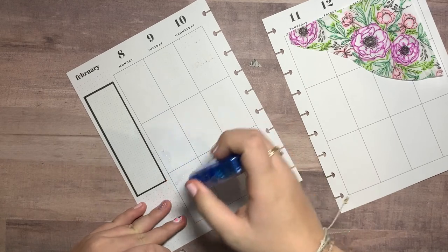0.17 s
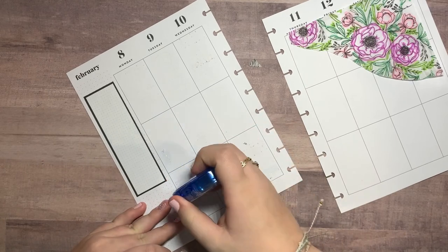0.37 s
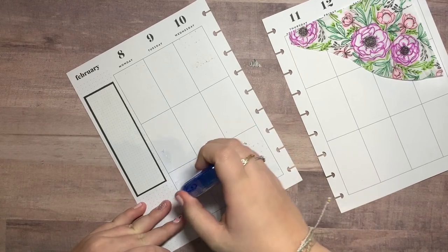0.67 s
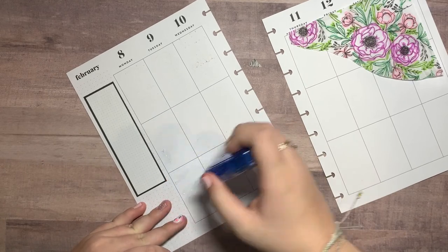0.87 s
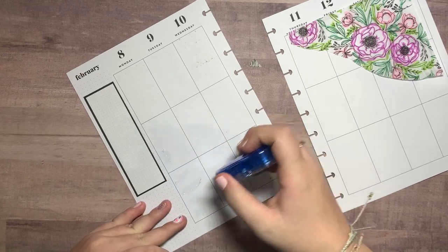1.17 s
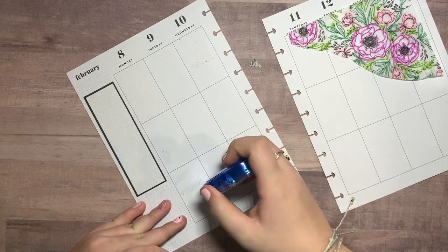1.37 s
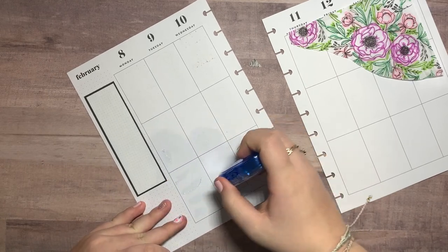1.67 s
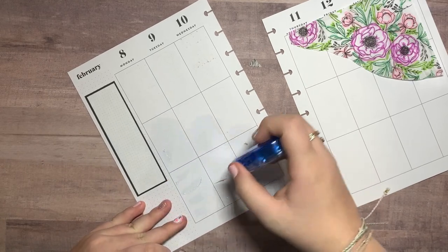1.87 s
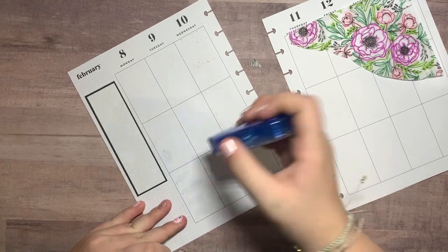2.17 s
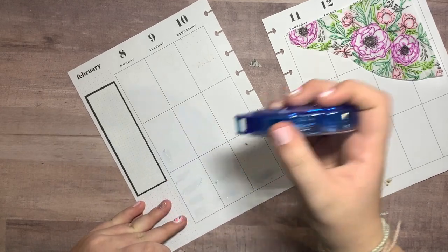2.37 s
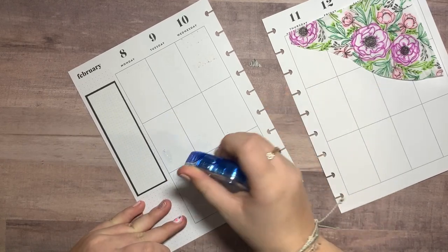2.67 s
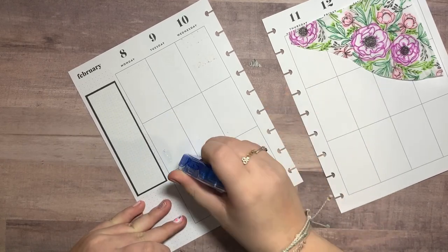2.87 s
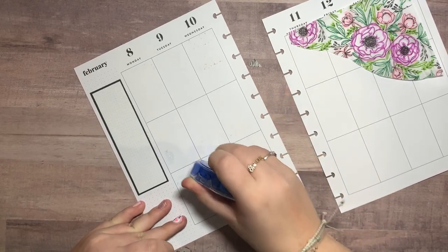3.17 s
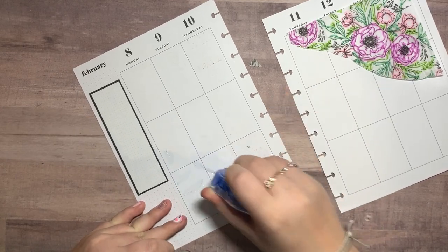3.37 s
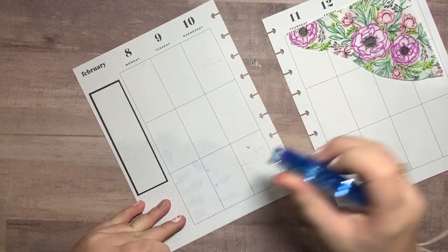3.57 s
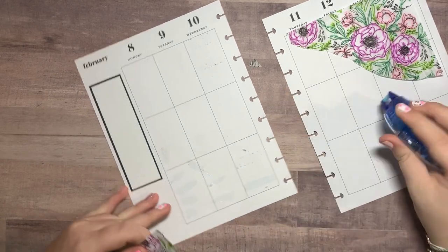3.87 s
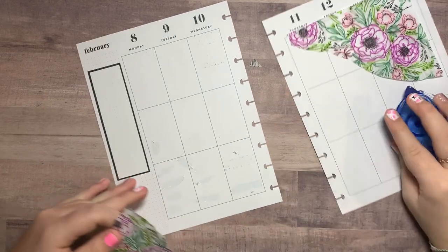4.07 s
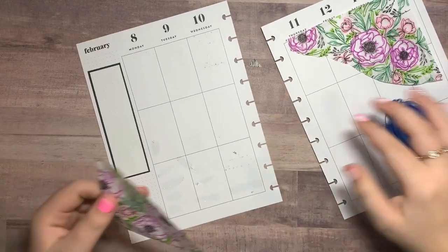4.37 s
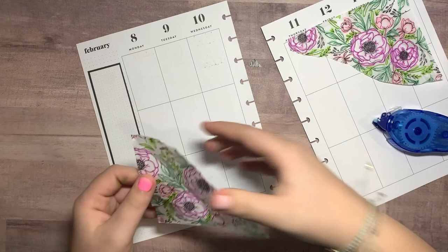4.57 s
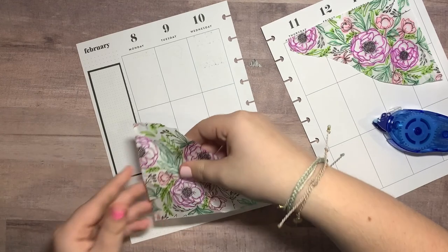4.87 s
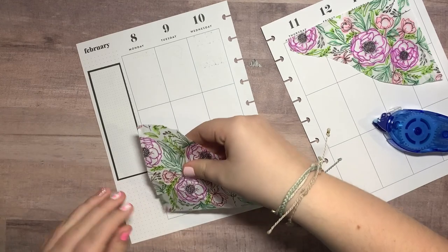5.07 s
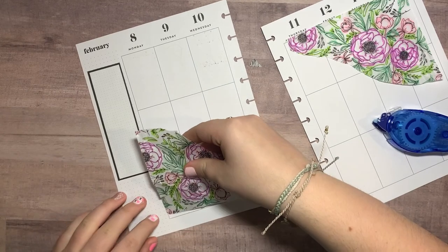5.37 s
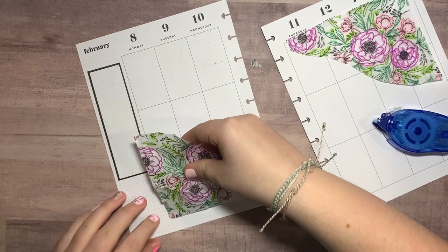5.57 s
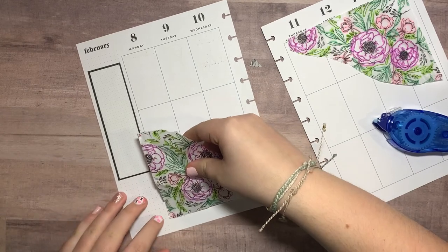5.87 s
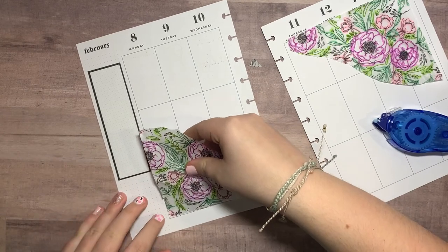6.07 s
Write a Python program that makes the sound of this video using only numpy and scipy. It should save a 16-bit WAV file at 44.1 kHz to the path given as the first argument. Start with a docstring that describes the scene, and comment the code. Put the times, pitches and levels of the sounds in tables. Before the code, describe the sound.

A quiet small room, heard close in stereo, with a soft low rumble and faint hiss throughout. At about 0.35 s a plastic tape roller touches paper on a wooden desk with a dull tap; a short brush leads into a fast ratcheting zip from 0.5 to 0.7 s, twelve crisp, bright clicks with a hollow plastic ring. Near-quiet follows, then a light thud at 1.3 s and a slightly slower zip from 1.4 to 1.67 s. Small plastic ticks gather from 2.45 to 2.97 s, with a soft thud at 2.84 s. The third and longest zip runs 2.98 to 3.26 s, speeding up. Faint paper slides follow, growing airy around 3.8 s. The tool is laid down with a firm clack and low thud at 4.2 s. Light paper and finger ticks follow, clearest at 4.69 s, fading after 5.3 s; a barely audible squeak comes near 5.7 s.

```python
"""In a quiet room with a low rumble, a faint whine and hiss, a plastic tape pen is set down on a wooden desk.
The desk thuds as noise-like touches ring the pen's parts; paper slides as grainy noise and the room echoes.
Three times the pen rolls over paper: each ratchet tooth snaps, rings the housing and jolts the desk.
Fingers tick in between; after the third roll the treble swells during sliding and the pen is laid aside.
Near the end comes a faint squeak made of narrow noise."""
import sys
import numpy as np
from scipy import signal
from scipy.fft import rfft, irfft
from scipy.io import wavfile
from scipy.ndimage import uniform_filter1d

SR = 44100
rng = np.random.default_rng(int(sys.argv[2]) if len(sys.argv) > 2 else 0)


def attenuation_scalar(level_db):
    """Turn a level in dB into a linear amplitude multiplier (20 dB per decade)."""
    decades = np.asarray(level_db, float) / 20
    return 10 ** decades


def wav_out(sig):
    """Save sig, one row per channel (or a flat mono array), as 16-bit PCM at SR to the path in sys.argv[1]."""
    wavfile.write(sys.argv[1], SR, np.round(np.clip(np.atleast_2d(sig).T, -1, 1) * 32767).astype(np.int16))


N = 274610  # samples in the whole scene
SIZE = 8192  # samples in one ringing sound
SILENT_DB = -200

# slow rise and fall of the building rumble: (t/s, level/dB)
RUMBLE_LEVEL = [(0.0, -65), (1.66, -63), (1.87, -66.5), (4.11, -58.5), (5.67, -64.5), (6.23, -63.5)]
# tone colour of the rumble: (f/Hz, level per Hz/dB)
RUMBLE_COLOUR = [(18, -42.5), (32, -7), (55, 3), (90, -5.5), (115, 0), (150, -13.5), (250, -19.5),
                 (330, -26), (550, -25.5), (800, -50.5)]
# tone colour of the microphone hiss: (f/Hz, level per Hz/dB)
HISS_COLOUR = [(250, -5), (550, -7.5), (1000, -8), (2200, -16.5), (6000, -19.5), (10500, -19), (13000, -19),
               (13800, -14), (14500, -19), (15200, -24)]
# blows into the desk top: (t/s, level/dB, push length/ms)
THUDS = [(.3435, -39.5, 2.73), (0.3578, -40, 4.4), (1.3298, -39.5, 3.6), (2.8388, -35, 3.4),
         (3.992, -48.5, 6.7), (4.1299, -39, 1.33), (4.1972, -28, 2.45), (4.682, -50.5, 0.27)]
# ways the desk top rings: (f/Hz, width before damping/Hz, relative level/dB)
DESK_MODES = [(54.5, 8.9, -7), (107.5, 12, 1), (150, 24, -5.5), (203, 75, -6), (259, 75, -6.5),
              (413, 80, -16.5), (617, 47, -11.5), (800, 110, -23)]
# small knocks of pen, nails and paper: (t/s, housing level/dB, snap level above housing/dB)
TICKS = [(0.3441, -54.5, -9), (0.3539, -51, -20), (0.3631, -47, -26.5), (0.4566, -58.5, 1.5),
         (0.4701, -57.5, -6), (0.4816, -72.5, 25.5), (.4977, -74.5, 16), (0.8402, -76, 3.5),
         (.99, -76.5, -14), (1.3271, -60.5, -22.5), (1.3829, -54.5, -32.5), (1.6937, -51, -16),
         (1.7792, -72, -3), (2.0651, -77, 13.5), (2.345, -79.5, -20), (2.404, -84, -24),
         (2.453, -58.5, -25.5), (2.4731, -53, -30), (2.5029, -65, -13), (2.519, -50, -25),
         (2.554, -72, -37), (2.5685, -64.5, -43), (2.6833, -54.5, -22.5), (2.7243, -61, -17),
         (2.7319, -50.5, -14), (2.776, -57.5, -32), (2.8, -63, -40), (2.8356, -56.5, -16),
         (2.8454, -49, -16), (2.916, -67, -35), (2.9311, -60.5, -14), (2.974, -60.5, 1.5),
         (3.3722, -66.5, -11), (3.401, -72.5, -19.5), (3.545, -73, -14.5), (3.5812, -73.5, 5),
         (3.689, -71.5, -24), (3.888, -70, -21), (3.9973, -57.5, 4), (4.116, -52.5, -11),
         (4.1323, -53, -11.5), (4.1867, -46, 13.5), (4.1995, -40, -0.5), (4.2267, -51.5, -16),
         (4.298, -65, -7), (4.343, -70.5, -17.5), (4.3821, -63.5, -22.5), (4.4116, -85, 15.5),
         (4.431, -78, -21), (4.6445, -68.5, 1.5), (4.6597, -75.5, 9.5), (4.6855, -48, -4), (4.712, -63, 0),
         (4.746, -59.5, -3), (4.767, -66, -21), (4.7902, -65.5, -10), (4.81, -68, -24.5),
         (4.931, -74.5, -20), (5.0912, -75, -8), (5.1067, -72, -31.5), (5.126, -82, -31), (5.3, -80, -7.5)]
# ways the hollow housing rings: (f/Hz, width before damping/Hz, relative level/dB)
HOUSING_MODES = [(950, 137, -11), (1252, 120, -8.5), (1644, 120, -1), (1957, 210, -1), (2605, 150, -1.5)]
# ways the shell rings: (f/Hz, width before damping/Hz, relative level/dB)
SHELL_MODES = [(3130, 1500, -10), (4010, 780, -2.5), (4802, 180, -4.5), (5900, 450, -11.5), (6810, 310, -5),
               (7980, 600, -2.5), (8600, 1500, -18.5)]
# ways the bright snap rings: (f/Hz, width before damping/Hz, relative level/dB)
SNAP_MODES = [(9450, 2500, -8.5), (12360, 800, -1.5), (13660, 230, 4), (14750, 730, -1.5), (15600, 660, -7)]
# time the room takes to fade by 60 dB: (f/Hz, t/s)
ROOM_FADE = [(150, 0.48), (2000, 0.19), (8000, 0.14), (15000, 0.062)]
# sliding paper and skin: (t/s, length/s, hiss level at start/dB, hiss level at end/dB, dull rustle level/dB)
SLIDES = [(0.449, 0.078, -74, -55, -62.5), (2.34, 0.071, -83.5, -81, -88.5), (2.45, 0.074, -75, -88, -68.5),
          (2.85, 0.19, -86, -63, -77), (3.312, 0.11, -62.5, -95, -77.5), (3.457, 0.17, -81, -78, -79.5),
          (3.731, 0.079, -63.5, -56.5, -77.5), (3.836, 0.097, -69, -63.5, -84),
          (3.994, 0.28, -56, -77, -71.5), (4.195, 0.2, -60.5, -82, -71.5), (4.431, 0.2, -90, -89, -80.5),
          (4.646, 0.055, -68, -63, -66), (4.735, 0.083, -83, -76, -70.5), (5.18, 0.15, -85, -86, -91)]
# tone colour of the fine sliding hiss: (f/Hz, level per Hz/dB)
SLIDE_COLOUR = [(1500, -24.5), (2800, -3), (4500, -2.5), (8000, -3), (11000, -1), (13500, -9), (16000, -5)]
# tone colour of the dull rustle: (f/Hz, level per Hz/dB)
RUSTLE_COLOUR = [(200, -21.5), (500, -5.5), (1500, 4), (2400, 2), (4000, -27.5)]
# moments of the ratchet teeth, one list for each stroke: (t/s, ..)
TEETH = [
    [.516, .5445, .5619, .5778, .5909, .6063, .62, .6334, .6492, .6651, .6795, .6951],
    [1.408, 1.4376, 1.4611, 1.4831, 1.5029, 1.5261, 1.55, 1.5743, 1.5996, 1.6226, 1.6442, 1.6632],
    [2.9831, 3.0234, 3.0543, 3.0775, 3.0973, 3.1164, 3.1369, 3.1565, 3.1761, 3.1943, 3.2121, 3.2283, 3.2434,
     3.2564],
]
# how hard each stroke presses:
# (snap level/dB, shell level/dB, housing level/dB, snap drift/dB per s, housing drift/dB per s)
STROKES = [(-26.5, -29.5, -39, -8, 6.5), (-27.5, -29, -34, 4.5, 25), (-28, -31, -31.5, -2.5, -14.5)]
# how the grip of each stroke tilts the ringing: (housing tilt/dB per octave, shell tilt/dB per octave)
GRIPS = [(-2.5, -3), (3.5, -0.3), (3.5, -0.5)]
# tone colour of the treble swell: (f/Hz, level per Hz/dB)
AIRY_COLOUR = [(9000, -20), (11000, -9), (13500, 9), (15500, -4)]
# difference in colour between the two microphone ports: (f/Hz, left minus right/dB)
PORT_BALANCE = [(100, 2.5), (400, -0.5), (750, -0.5), (1300, -1.5), (1800, -2.5), (2900, 3.5), (3800, -1.5),
                (5100, 4.5), (6800, -4), (9000, 0.5)]


def colour(points, hz):
    """Turns a colour table into gains, going smoothly from point to point in pitch."""
    f, db = np.transpose(points)
    return attenuation_scalar(np.interp(np.log(hz + 1), np.log(f), db, left=SILENT_DB, right=SILENT_DB))


def noise(points, alike):
    """Coloured noise of unit level; alike is the share of power from noise common to both sides."""
    mid, side = rng.standard_normal((2, N))
    both = np.sqrt(alike) * mid + np.sqrt(1 - alike) * side * np.array([[1], [-1]])
    out = irfft(rfft(both) * colour(points, np.fft.rfftfreq(N, 1 / SR)), N)
    return out / out.std()


def curve(rows, column):
    """Draws one dB column over time, silent outside the rows."""
    rows = np.array(rows)
    return np.interp(np.arange(N) / SR, rows[:, 0], rows[:, column], left=SILENT_DB, right=SILENT_DB)


def ring(force, modes, db, damping=0.94, tilt_db=0., spread=1):
    """A force rings an object's modes, with new chance weights per blow and side; db is its level over 9 ms."""
    blow_s = .009
    pitch_scatter, scatter_db = .012, 2.5  # both times spread
    side_db, side_rad = 2, .55  # scatter between the sides, both times spread
    hz = np.fft.rfftfreq(SIZE, 1 / SR) + 1
    f, width, gain_db = np.transpose(modes)[:, :, None]
    chance = spread * rng.standard_normal((6, len(modes), 1))
    f = f * (1 + pitch_scatter * chance[0])
    gain_db = gain_db + tilt_db * np.log2(f / f[0]) + scatter_db * chance[1]
    # neighbouring modes push in opposite directions
    direction = (-1) ** np.arange(len(modes))[:, None]
    shape = direction / (1 + 1j * (hz ** 2 - f ** 2) / (hz * width * damping))
    # little is radiated below the lowest and above the highest mode
    low, high = 1j * hz / (0.91 * f[0]), 1j * hz / (2.1 * f[-1])
    edges = low ** 2 / (1 + 1.1 * low + low ** 2) / (1 + 3.0 * high + high ** 2)
    # each side hears every mode with its own strength and phase
    turn = side_rad * chance[4:]
    phase = np.cos(turn) + 1j * hz / f * np.sin(turn)
    sides = np.sum(shape * attenuation_scalar(gain_db + side_db * chance[2:4]) * phase, axis=1)
    out = irfft(rfft(force, SIZE) * edges * sides, SIZE)
    return out * attenuation_scalar(db) / np.sqrt(np.sum(out ** 2) / (2 * blow_s * SR))


def scrape(rise_ms, fall_ms, late_ms=0.):
    """A rough contact makes noise that swells and dies within milliseconds."""
    t_ms = np.maximum(np.arange(SIZE // 4) / SR * 1000 - late_ms, 0)
    return rng.standard_normal(len(t_ms)) * (1 - np.exp(-t_ms / rise_ms)) * np.exp(-t_ms / fall_ms)


def add(out, s, sound):
    """Mixes a short sound in at s seconds."""
    i = int(s * SR)
    out[:, i:i + sound.shape[1]] += sound[:, :N - i]


def background():
    """Building rumble that wanders in level, a faint narrow whine and the microphone's own hiss."""
    whine_hz, whine_db, hiss_db = 797, -93, -80.5
    wander_db = 2.5  # before smoothing
    whine = noise([(whine_hz - 25, -20), (whine_hz, 0), (whine_hz + 25, -20)], 1.0)
    steps = rng.standard_normal(N // 5000 + 1).repeat(5000)[:N]
    wander = wander_db * uniform_filter1d(steps, size=5000)
    rumble = noise(RUMBLE_COLOUR, 0.87) * attenuation_scalar(curve(RUMBLE_LEVEL, column=1) + wander)
    return rumble + whine * attenuation_scalar(whine_db) + noise(HISS_COLOUR, 0.29) * attenuation_scalar(hiss_db)


def knock(force, db):
    """A push into the desk top: bending waves bring the highs first and the lows late."""
    bending_rad = .65  # phase lag per root of Hz
    hz = np.fft.rfftfreq(SIZE, 1 / SR)
    late = irfft(rfft(force, SIZE) * np.exp(-1j * bending_rad * np.sqrt(hz)), SIZE)
    return ring(late, DESK_MODES, 0, spread=.25) * attenuation_scalar(db)


def thuds():
    """Soft pushes ring the desk top; the longer the push, the duller the sound."""
    out = np.zeros((2, N))
    t_ms = np.arange(SIZE // 8) / SR * 1000
    for s, db, push_ms in THUDS:
        push = np.sin(np.pi * np.minimum(t_ms / push_ms, 1)) ** 2
        add(out, s, knock(push, db))
    return out


def ticks():
    """Light touches ring the pen's parts, damped by the fingers; a duller touch pushes more softly."""
    damping = 1.7  # widens every mode, so it rings shorter
    shell_share, shell_offset_db = 0.47, 6  # shell level follows part of the snap level
    contact_ms, contact_ms_per_db, contact_ref_db = 3.4, 0.07, -60  # louder touches last longer
    soft_hz, soft_per_db = 9050, 0.27  # cut-off of the force, and its dB per dB of snap
    housing_tilt_db, housing_tilt_share = -4, .08  # dB per octave, and its part per dB of snap
    out = np.zeros((2, N))
    for s, db, snap_db in TICKS:
        shell_db = shell_share * snap_db + shell_offset_db
        touch = scrape(.6, max(contact_ms + contact_ms_per_db * (db - contact_ref_db), 1))
        cut_hz = np.clip(soft_hz * attenuation_scalar(soft_per_db * snap_db), 1500, 18000)
        soft = signal.sosfilt(signal.butter(3, cut_hz, fs=SR, output="sos"), touch)
        housing_tilt = housing_tilt_db + housing_tilt_share * snap_db
        shell_tilt = .7 * min(snap_db - shell_db, 0)
        add(out, s, ring(soft, HOUSING_MODES, db, damping, tilt_db=housing_tilt))
        add(out, s, ring(soft, SHELL_MODES, db + shell_db, damping, tilt_db=shell_tilt))
        add(out, s, ring(touch, SNAP_MODES, db + snap_db, damping))
    return out


def room(x):
    """Walls answer with a decaying cloud of echoes, band by band, different on each side."""
    room_db = -16
    t = np.arange(int(.45 * SR)) / SR
    white = rfft(rng.standard_normal((2, len(t))))
    hz = np.fft.rfftfreq(len(t), 1 / SR) + 1
    f, t60 = np.transpose(ROOM_FADE)
    tail = 0
    for centre in 125 * 2. ** np.arange(8):  # Hz, one octave apart
        band = np.maximum(1 - np.abs(np.log2(hz / centre)), 0)
        fade_s = np.interp(np.log(centre), np.log(f), t60)
        tail = tail + irfft(white * band, len(t)) * attenuation_scalar(-60 * t / fade_s)
    # the echoes start after 3 ms
    tail = tail * np.clip((t - .003) / 0.0027, 0, 1)
    tail = tail / np.sqrt(np.sum(tail ** 2) / 2)
    return signal.fftconvolve(x, tail, axes=1)[:, :N] * attenuation_scalar(room_db)


def slides():
    """Dense fibre grains make a fine hiss while things slide; heavier contact adds a duller, grittier rustle."""
    attack_s, release_s = 0.0091, 0.012
    hiss_grit_db, rustle_grit_db = 2.2, 3.5  # per unit of grain size, before smoothing
    grains = rng.exponential(size=N // 60 + 1).repeat(60)[:N]
    bright = noise(SLIDE_COLOUR, 0.45) * uniform_filter1d(attenuation_scalar(hiss_grit_db * grains), 80)
    dull = noise(RUSTLE_COLOUR, .5) * uniform_filter1d(attenuation_scalar(rustle_grit_db * grains), 80)
    t, level, heavy = np.arange(N) / SR, 0, 0
    for s, length, start_db, end_db, dull_db in SLIDES:
        onset = np.clip((t - s) / attack_s + 1, 0, 1) ** 2
        contact = onset * np.exp(-np.maximum(t - s - length, 0) / release_s)
        level = level + contact * attenuation_scalar(np.interp(t, [s, s + length], [start_db, end_db]))
        heavy = heavy + contact * attenuation_scalar(dull_db)
    return bright / bright.std() * level + dull / dull.std() * heavy


def ratchet():
    """The pawl skids off a tooth with a bright snap, then lands and rings the hollow housing."""
    alike, spread = .5, .55  # shared power of the skids, chance spread of the ringing
    scatter_db = 1.2  # from tooth to tooth
    jolt_db = -23  # desk level relative to snap
    out = np.zeros((2, N))
    for teeth, stroke, (housing_tilt, shell_tilt) in zip(TEETH, STROKES, GRIPS):
        snap_db, shell_db, housing_db, snap_drift, housing_drift = stroke
        # the teeth are moulded alike, so much of the skid repeats
        shared = scrape(0.99, 2.3)
        # the sharp let-go at the head of each snap
        release = scrape(0.13, 0.36, .6)
        for s in teeth:
            since = s - teeth[0]
            luck = scatter_db * rng.standard_normal(3)
            tooth_snap_db = snap_db + snap_drift * since + luck[0]
            tooth_housing_db = housing_db + housing_drift * since + luck[2]
            skid = np.sqrt(alike) * shared + np.sqrt(1 - alike) * scrape(1.0, 1.4)
            landing = scrape(.6, 1.5, 1.5)
            snap_force = skid + 1.5 * release + 0.072 * landing
            shell_force = skid + 1.8 * landing
            housing_force = scrape(.6, 1.0, 2.0) + 0.6 * skid
            add(out, s, ring(snap_force, SNAP_MODES, tooth_snap_db, spread=spread))
            add(out, s, ring(shell_force, SHELL_MODES, shell_db + luck[1], tilt_db=shell_tilt, spread=spread))
            add(out, s, ring(housing_force, HOUSING_MODES, tooth_housing_db, tilt_db=housing_tilt, spread=spread))
            # a little of each jolt goes through the roller into the desk
            jolt = np.hanning(60) * (1 + rng.standard_normal(60))
            add(out, s, knock(jolt, tooth_snap_db + jolt_db))
    return out


def swell(points, s, length, db):
    """Coloured noise comes and goes within length seconds, reaching db halfway."""
    part = np.clip((np.arange(N) / SR - s) / length, 0, 1)
    return noise(points, .8) * np.sqrt(np.abs(np.sin(np.pi * part))) * attenuation_scalar(db)


def airy_swell():
    """Airy noise makes the treble swell while things slide."""
    return swell(AIRY_COLOUR, s=3.73, length=0.24, db=-69.5)


def squeak():
    """A narrow band of noise makes a faint squeak."""
    hz = 2200
    return swell([(hz - 150, -20), (hz, 0), (hz + 150, -20)], s=5.64, length=0.11, db=-88)


def scene():
    """Adds up all contacts, their echoes and the background."""
    near = thuds() + ticks() + slides() + ratchet() + airy_swell() + squeak()
    return near + room(near) + background()


def low_pass(x):
    """Removes everything above the highest recorded frequency."""
    return signal.sosfilt(signal.butter(12, 16960, fs=SR, output="sos"), x)


def record(dry):
    """One capsule gives both sides their treble; the ports differ in colour, and the left lags in the highs."""
    lag_ms, lag_from_hz, shared_hz = 0.1542, 2000, 6800
    hz = np.fft.rfftfreq(N, 1 / SR) + 1
    both, sign = rfft(dry), np.array([[1], [-1]])
    # the right side takes over the left one's treble
    both[1] += (both[0] - both[1]) / (1 + (shared_hz / hz) ** 6)
    f, db = np.transpose(PORT_BALANCE)
    balance_db = np.interp(np.log(hz), np.log(f), db)
    turn = 2 * np.pi * hz * lag_ms / 1000 / (1 + (lag_from_hz / hz) ** 8)
    # each side takes half of the lag and half of the balance
    both = both * np.exp(-.5j * turn * sign) * attenuation_scalar(sign * balance_db / 2)
    mix = irfft(both, N)
    return low_pass(mix)


dry = scene()
out = record(dry)
wav_out(out)
```